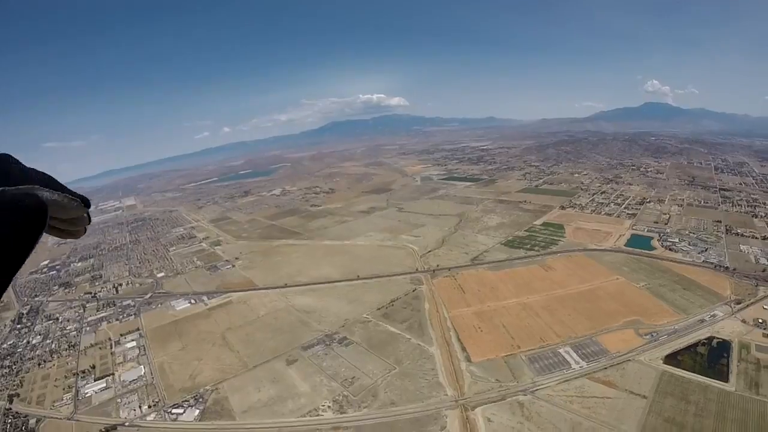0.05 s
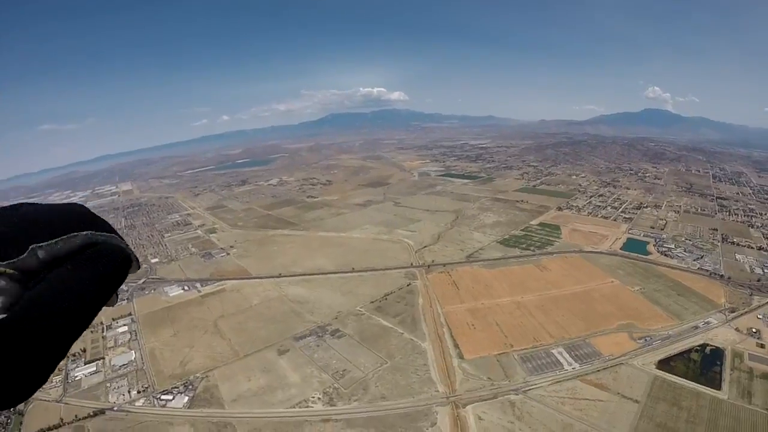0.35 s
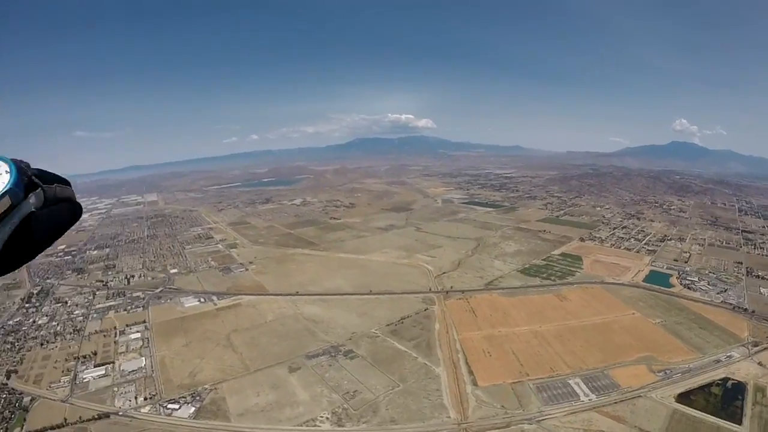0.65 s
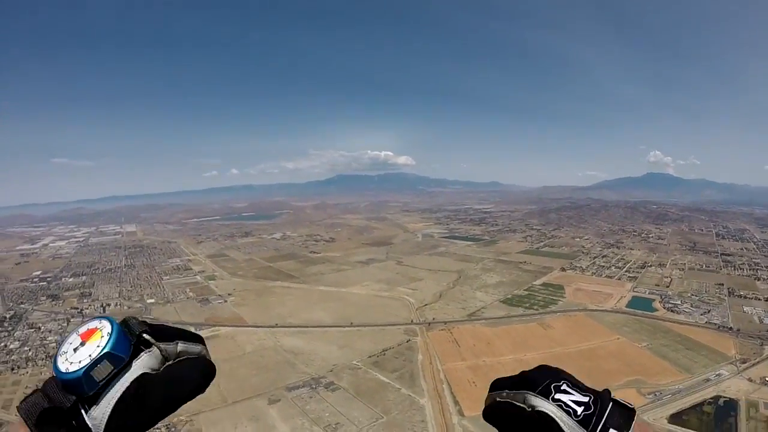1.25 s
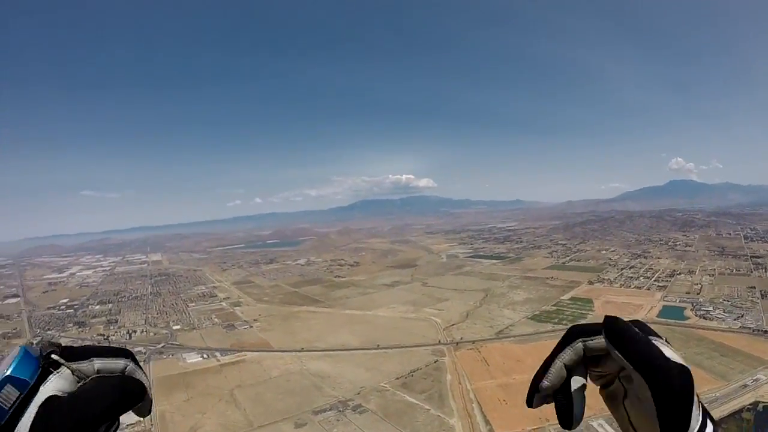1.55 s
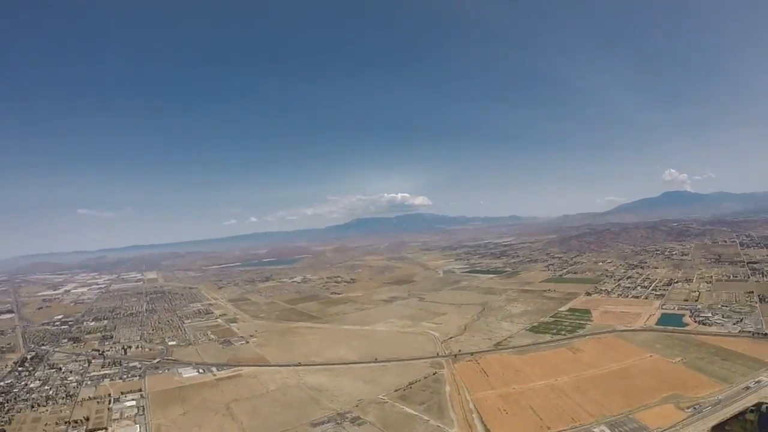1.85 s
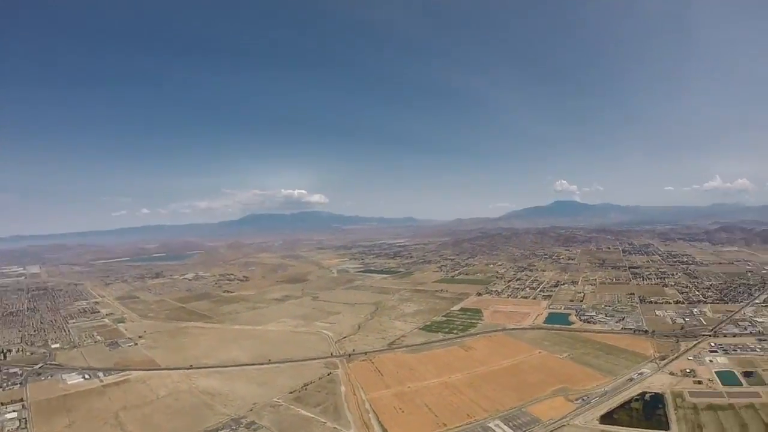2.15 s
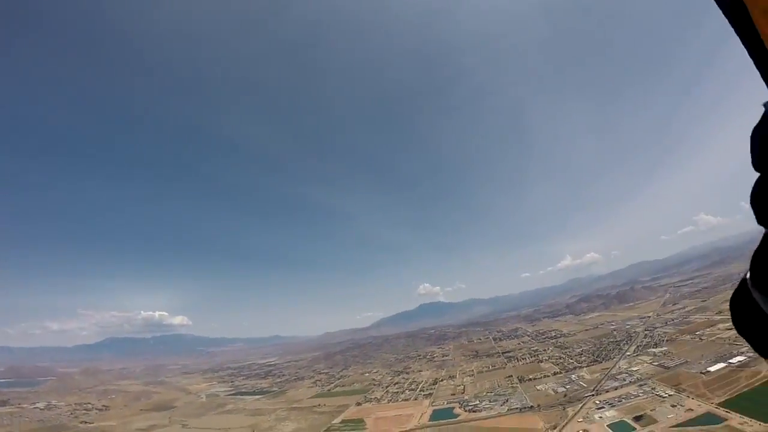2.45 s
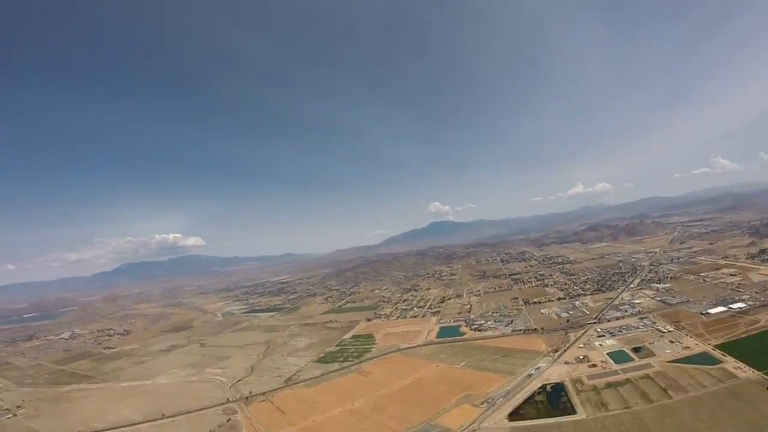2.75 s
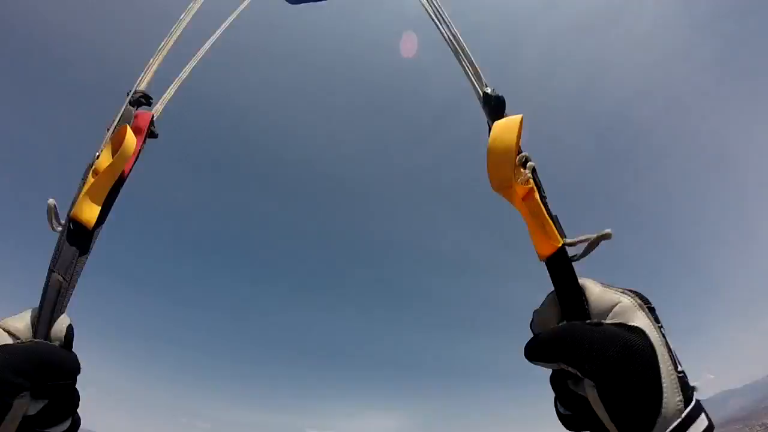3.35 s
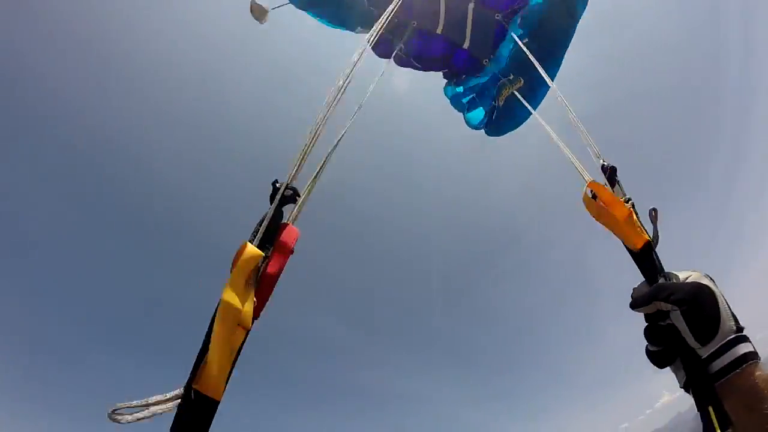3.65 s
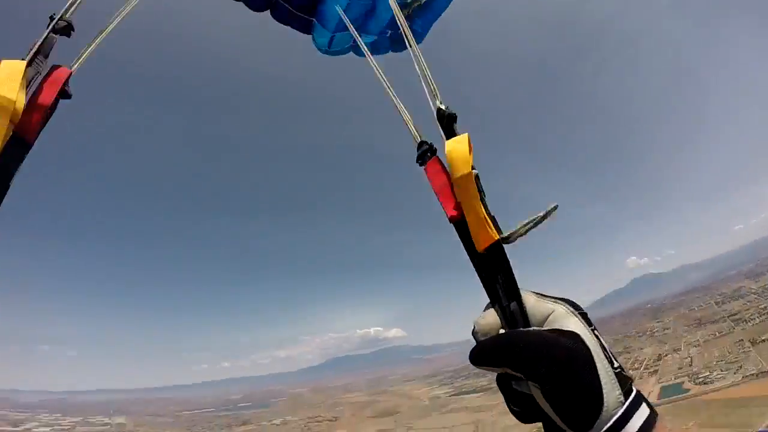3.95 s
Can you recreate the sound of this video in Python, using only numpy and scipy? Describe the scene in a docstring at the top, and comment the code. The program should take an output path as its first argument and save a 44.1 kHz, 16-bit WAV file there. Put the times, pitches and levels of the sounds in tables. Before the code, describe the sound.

Wind roars and thumps on a skydiver's helmet microphone in freefall. Midway the air tears past in a brief, bright burst, then comes in separate slaps, and a parachute cracks and rustles open overhead.

```python
"""Wind buffets and roars right on the microphone: freefall, heard from a camera on a skydiver's helmet.
Eddies break on the microphone port as sharp pressure pulses, among gusts of roar and hiss. Near 2 s
the air tears loudly as the arm swings back to throw the pilot chute. Then the body tips upright, the
wind comes in separate slaps, and the opening canopy cracks and rustles overhead."""
import sys
import numpy as np
from scipy import signal
from scipy.fft import rfft, irfft
from scipy.io import wavfile
from scipy.ndimage import uniform_filter1d, minimum_filter1d

SR = 44100
rng = np.random.default_rng(int(sys.argv[2]) if len(sys.argv) > 2 else 0)


def wav_out(sig):
    """Save sig, one row per channel (or a flat mono array), as 16-bit PCM at SR to the path in sys.argv[1]."""
    wavfile.write(sys.argv[1], SR, np.round(np.clip(np.atleast_2d(sig).T, -1, 1) * 32767).astype(np.int16))


N = 176400

# Wind on the microphone between slaps, lowest layer first: t/s, level/dB
RUMBLE_LEVELS = [(0, -24), (.8, -27), (1.2, -17.5), (1.9, -26), (2.45, -21), (2.62, -17.5), (2.85, -21),
                 (3.42, -19), (4, -21.5)]
BUFFET_LEVELS = [(0.0, -15.5), (2.43, -18.5), (2.54, -25), (2.6, -20.5), (3.05, -20.5), (3.5, -19.5),
                 (3.53, -30), (3.6, -16), (3.68, -17), (3.78, -22), (4.0, -19)]
LOW_ROAR_LEVELS = [(0, -35), (.5, -20), (.72, -26), (.84, -25.5), (1.1, -34), (1.42, -21), (1.58, -29.5),
                   (1.85, -29.5), (1.98, -19), (2.1, -25), (2.26, -19), (2.46, -33), (2.72, -30.5),
                   (2.98, -24), (3.22, -36), (3.33, -22.5), (3.54, -29), (3.68, -22.5), (3.93, -30.5)]
ROAR_LEVELS = [(0, -20.5), (.3, -24), (.48, -23.5), (.66, -24), (.72, -32.5), (.83, -23), (.92, -32),
               (1.03, -29), (1.36, -29.5), (1.48, -29.5), (1.93, -31), (2.0, -20), (2.11, -29.5),
               (2.28, -25), (2.36, -29), (2.44, -35.5), (2.6, -29.5), (2.79, -32.5), (2.86, -34),
               (3.0, -27.5), (3.12, -30.5), (3.23, -38), (3.31, -28), (3.53, -37.5), (3.68, -29),
               (3.8, -36.5), (4, -33)]
HISS_LEVELS = [(0, -39.5), (.3, -43.5), (.6, -40.5), (.72, -44.5), (.85, -42.5), (1.03, -45.5), (1.32, -44),
               (1.48, -42), (1.55, -47), (1.85, -45), (2.0, -39.5), (2.1, -42.5), (2.2, -45), (2.37, -42.5),
               (2.45, -51), (2.58, -45), (2.78, -49.5), (3.1, -47.5), (3.23, -51), (3.33, -47), (3.53, -57),
               (4, -55)]
# Spectra of the same five layers: f/Hz, level/dB
RUMBLE_SPECTRUM = [(10, -18), (22, -4.5), (40, -3.5), (55, -0.5), (90, -16)]
BUFFET_SPECTRUM = [(25, -25.5), (45, -8), (62, -1.5), (90, -2.5), (130, -4), (190, -9.5), (280, -18),
                   (600, -49.5)]
LOW_ROAR_SPECTRUM = [(70, -24.5), (160, -0.5), (220, -1.5), (350, -7.5), (500, -20.5), (1000, -44)]
ROAR_SPECTRUM = [(120, -14.5), (290, 1.5), (480, 1), (750, -6), (1300, -12), (1750, -18.5), (2400, -32),
                 (4000, -40)]
HISS_SPECTRUM = [(1200, -13.5), (2200, 1.5), (2900, 3), (3900, -2.5), (5400, -3), (7000, -11.5),
                 (8300, -14.5), (11000, -23), (15000, -35)]
# Big eddies slapping the port: t/s, pulse level/dB, roar level/dB, hiss level/dB, length/s
PORT_SLAPS = [(0.215, -7, -20, -34.5, 0.0087), (0.263, -5, -13, -31, 0.003),
              (.347, -12, -11.5, -34, 0.0045), (0.421, -12, -11, -29, 0.003),
              (0.491, -27, -14, -33.5, 0.012), (0.562, -7, -14.5, -28.5, 0.0035),
              (0.76, -20, -13.5, -40, 0.0048), (0.823, 11, -18, -40, 0.0074), (0.99, 0.5, -28, -39, 0.0064),
              (1.177, 4.5, -20, -44, 0.0054), (1.2503, -7, -15, -31.5, 0.0062), (1.502, -2, -26, -42, .006),
              (1.768, -3.5, -15.5, -34, 0.0043), (1.899, -27, -13.5, -33, 0.0092),
              (1.962, -2, -25, -28, 0.0033), (2.174, -9, -19, -34, 0.0059), (2.201, 7, -31, -47, 0.005),
              (2.226, -8, -18.5, -37.5, 0.0038), (2.399, 3, -15, -34, 0.0057),
              (2.498, -12, -20.5, -48, 0.0063), (2.545, -0.5, -21.5, -39.5, 0.014),
              (2.575, -6.5, -18, -40, 0.0049), (2.647, 8, -15.5, -34, 0.0068),
              (2.655, -4.5, -32, -33.5, 0.0027), (2.709, -4, -16.5, -37, 0.0067),
              (2.76, 4, -24, -41, 0.0026), (2.834, -15, -24, -43.5, 0.034), (2.915, -6, -17, -40.5, 0.0062),
              (2.992, -14, -20, -38.5, .007), (3.069, -32, -23, -40.5, 0.0099),
              (3.107, -6, -20.5, -51, 0.011), (3.1887, -12, -14, -31, 0.0085),
              (3.278, 0.5, -23.5, -40, 0.0092), (3.33, 0, -24.5, -56, 0.0095),
              (3.37, -5, -17, -39.5, 0.0048), (3.402, -0.5, -22.5, -40.5, 0.013),
              (3.467, -0.5, -25.5, -40.5, 0.025), (3.659, 0, -28, -33.5, 0.0036),
              (3.681, 2.5, -28, -45, 0.0062)]
# The flow lets go of the port for a moment: t/s, level/dB
FLOW_LULLS = [(.697, -6), (0.782, -6), (1.009, -14.5), (1.162, -11), (1.677, -15.5), (2.109, -10.5),
              (2.426, -5.5), (2.741, -13), (2.777, -11.5), (3.426, -9)]
# Air tearing across the port: t/s, length/s, level/dB
TEAR_BURSTS = [(1.894, 0.025, -20.5), (1.953, 0.052, -16), (2.013, 0.035, -18)]
# Spectrum of the tearing: f/Hz, level/dB
TEAR_SPECTRUM = [(100, 3.5), (330, 0.5), (750, 0.5), (1400, -6), (2300, -17), (2950, -10), (3900, -20),
                 (5500, -25), (8000, -35.5), (15000, -55)]
# The canopy catching the air overhead: t/s, level/dB
CANOPY_SNAPS = [(3.1895, 0), (3.611, -3.5), (3.7554, 1.5)]
# Rustle of the canopy: t/s, level/dB
RUSTLE_LEVELS = [(3.2, -74), (3.5, -40.5), (3.7, -35), (3.85, -32.5), (3.93, -37.5), (4, -30.5)]
# Spectrum of the rustle: f/Hz, level/dB
RUSTLE_SPECTRUM = [(250, -8), (700, 8), (1000, 5), (1650, 1), (2350, -15), (3150, -6.5), (4400, -15),
                   (5300, -10), (7200, -26), (8300, -25.5), (11000, -37), (15000, -47)]
# Gear ticking near the microphone: t/s, level/dB
GEAR_TICKS = [(.576, -34), (1.8, -33), (2.711, -38)]
# Stereo width, side relative to mid: f/Hz, level/dB
SIDE_SPECTRUM = [(450, -78), (1400, -45), (2800, -42), (5500, -12.5), (9000, -7), (14000, -0.5)]
# The air reaches the left channel a hair later: f/Hz, phase lag/rad
LEFT_PHASE_LAG = [(180, 0), (500, .05), (1100, .13), (2500, .3), (7500, .85), (15000, 2.0)]

PORT_LEAK_HZ = 69  # the port leaks away pressure changes slower than this


def airstream(gust_db=2.0, hiss_gust_db=1.5, flutter_db=2.5, crackle_db=4.0):
    """Wind right on the port: the layers share gusts, and each pressure swing stirs finer turbulence."""
    times, pulse_db, roar_db, hiss_db, lengths = np.transpose(PORT_SLAPS)
    gust, flutter = drift(rate_hz=42), drift(rate_hz=180)
    gust_gain = from_db(gust_db * gust)
    pressure = evened(air_noise(BUFFET_SPECTRUM)[0] * gust_gain, span_s=0.071)
    stir = passed(np.minimum(np.abs(pressure), 2), 220, "low")
    roar_swing = swing(gust_db * gust + flutter_db * flutter + 6.5 * stir, span_s=0.07)
    hiss_swing = swing(hiss_gust_db * gust + flutter_db * flutter + stir, span_s=0.05)
    crackle = rms_one(from_db(crackle_db * drift(rate_hz=310)))
    # Running wind and slaps add in power.
    roar_gain = np.hypot(from_db(-1) * level(ROAR_LEVELS) * roar_swing,
                         slap_swell(times, roar_db, lengths))
    hiss_gain = np.hypot(level(HISS_LEVELS) * hiss_swing, slap_swell(times, hiss_db, lengths))
    buffet = pressure * level(BUFFET_LEVELS)
    rumble = evened(air_noise(RUMBLE_SPECTRUM)[0] * gust_gain, span_s=0.096) * level(RUMBLE_LEVELS)
    low_roar = air_noise(LOW_ROAR_SPECTRUM) * level(LOW_ROAR_LEVELS) * roar_swing ** 0.99
    roar = air_noise(ROAR_SPECTRUM) * roar_gain
    hiss = air_noise(HISS_SPECTRUM) * crackle * hiss_gain
    wind = rumble + buffet + low_roar + roar + hiss + small_eddies(roar_swing)
    return lulls() * wind + suction(times, pulse_db)


def slap_swell(times, levels_db, lengths, attack_share=0.47):
    """Gain as big eddies hit the microphone: short swells that rise faster than they fall."""
    gain = np.zeros(N)
    for peak, db, length in zip(times, levels_db, lengths):
        age = (seconds() - peak) / length
        gain += from_db(db) * decay(2 * np.where(age < 0, age / attack_share, age) ** 2)
    return gain


def suction(times, levels_db, rise_s=0.00074, fall_s=0.00091, edge_hz=1030):
    """The core of each big eddy is a pointed drop in pressure at the port."""
    t, pressure = seconds(), np.zeros(N)
    for peak, db in zip(times, levels_db):
        pressure -= from_db(db) * decay(np.maximum((peak - t) / rise_s, (t - peak) / fall_s))
    return passed(passed(pressure, edge_hz, "low"), PORT_LEAK_HZ, "high")


def small_eddies(gust, per_s=120, spread_db=1, sag_hz=255, round_hz=1650, trim_db=-3):
    """Small eddies hit the port at random, more often in gusts: steep fronts that sag back."""
    hits = rng.random(N) < per_s * gust / SR
    sizes = from_db(spread_db * np.clip(rng.standard_normal(N), -2, 1))
    signs = rng.choice([-1, 1], N)
    fronts = passed(hits * sizes * signs, sag_hz, "low")
    rounded = passed(fronts, round_hz, "low", order=3)
    pressure = passed(rounded, PORT_LEAK_HZ, "high")
    return from_db(trim_db) * level(ROAR_LEVELS) * evened(pressure, span_s=0.038)


def lulls(width_s=0.0065):
    """Gain of the wind as the flow lets go of the port: short, smooth dips."""
    return from_db(sum(db * decay(((seconds() - centre) / width_s) ** 2) for centre, db in FLOW_LULLS))


def tearing_air(attack_s=0.0031, release_s=0.005, ragged_db=4.0):
    """Air tears across the port in bright, ragged bursts: a fast attack, a hold and a short release."""
    gain = np.zeros(N)
    for start, length, db in TEAR_BURSTS:
        age = seconds() - start
        gain += from_db(db) * np.clip(age / attack_s, 0, 1) * decay((age - length) / release_s)
    bursts = gain * air_noise(TEAR_SPECTRUM)
    return bursts * evened(from_db(ragged_db * drift(rate_hz=160)), span_s=0.0086)


def canopy_snaps(sag_s=0.0006, rebound_s=0.002, rebound_share=0.19, edge_hz=1050):
    """Dry cracks overhead as the canopy catches air: the pressure sags, lets go at once and rebounds."""
    pressure = np.zeros(N)
    for release, db in CANOPY_SNAPS:
        age = seconds() - release
        sag = decay(-age / sag_s)
        rebound = rebound_share * decay(age / rebound_s)
        pressure += from_db(db) * np.where(age < 0, -sag, rebound)
    return passed(pressure, edge_hz, "low", order=2)


def canopy_rustle(flutter_db=3.0):
    """Fabric and lines flutter above the helmet as the canopy fills."""
    rustle = level(RUSTLE_LEVELS) * air_noise(RUSTLE_SPECTRUM)
    return rustle * rms_one(from_db(flutter_db * drift(rate_hz=45)))


def gear_ticks(decay_s=0.0011, low_hz=4540, high_hz=8000):
    """Tiny, bright ticks of gear close by, almost buried in the wind."""
    t = seconds()
    gain = sum(from_db(db) * (t > start) * decay((t - start) / decay_s) for start, db in GEAR_TICKS)
    treble = passed(rng.standard_normal(N), low_hz, "high", order=2)
    return gain * rms_one(passed(treble, high_hz, "low", order=3))


def air_noise(spectrum):
    """Stereo noise at the microphone, mono in the bass and wide in the treble; rms 1."""
    mid, side = rfft(rng.standard_normal((2, N))) * colour(spectrum)
    side = side * colour(SIDE_SPECTRUM)
    lag = np.exp(-1j * np.interp(frequencies(), *np.transpose(LEFT_PHASE_LAG)))
    return rms_one(irfft(np.array([(mid + side) * lag, mid - side]), N))


def drift(rate_hz):
    """A smooth random wander with rounded extremes; rms 1."""
    wander = irfft(rfft(rng.standard_normal(N)) / (1 + (frequencies() / rate_hz) ** 2), N)
    return rms_one(np.tanh(rms_one(wander) / 2))


def swing(db, span_s):
    """A wavering gain near 1 whose highest surges are rounded off."""
    return rms_one(2 * np.tanh(evened(from_db(db), span_s) / 2))


def evened(x, span_s):
    """Hold the rms near 1 over a span, keeping the faster swings."""
    size = max(int(span_s * SR), 8)
    return x / np.sqrt(uniform_filter1d(uniform_filter1d(x ** 2, size), size) + 1e-12)


def level(rows):
    """Gain over time from rows of t/s, level/dB."""
    return from_db(np.interp(seconds(), *np.transpose(rows)))


def colour(rows):
    """Gain over frequency from rows of f/Hz, level/dB, falling away above the last."""
    hz, db = np.transpose(rows)
    f = np.maximum(frequencies(), 1)
    return from_db(np.interp(np.log(f), np.log(hz), db)) / np.maximum(f / hz[-1], 1) ** 2


def passed(x, hz, kind, order=1):
    """Gentle low- or high-pass."""
    return signal.sosfilt(signal.butter(order, hz, kind, fs=SR, output="sos"), x + 1e-18)


def decay(x):
    """1 until x reaches 0, then an exponential fall."""
    return np.exp(-np.clip(x, 0, 20))


def from_db(db):
    """Decibels to gain."""
    return 10 ** (np.asarray(db) / 20)


def rms_one(x):
    """Scale to rms 1."""
    return x / np.sqrt(np.mean(x ** 2) + 1e-20)


def seconds():
    """Time of every sample."""
    return np.arange(N) / SR


def frequencies():
    """Frequency of every spectral bin."""
    return np.arange(N // 2 + 1) * SR / N


def scene():
    """At the helmet: wind on the microphone, canopy overhead, gear close by."""
    return airstream() + tearing_air() + canopy_rustle() + canopy_snaps() + gear_ticks()


def record(dry, fade_s=0.003, limiter_samples=220, stop_hz=16300):
    """The sound eases in and out at its ends; then a fast limiter and a steep cut of the top treble."""
    t = seconds()
    faded = dry * np.clip(np.minimum(t, t[-1] - t) / fade_s, 0, 1)
    peaks = np.abs(faded).max(axis=0)
    held_gain = minimum_filter1d(1 / np.maximum(peaks, 1), limiter_samples)
    limited = faded * uniform_filter1d(held_gain, limiter_samples)
    return signal.sosfilt(signal.cheby2(14, 70, stop_hz, fs=SR, output="sos"), limited)


dry = scene()
out = record(dry)
wav_out(out)
```